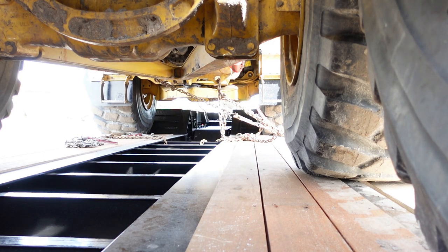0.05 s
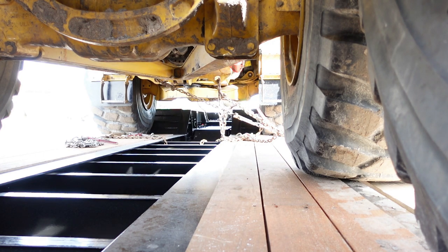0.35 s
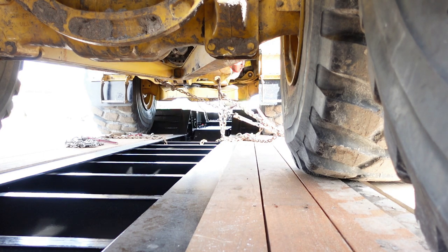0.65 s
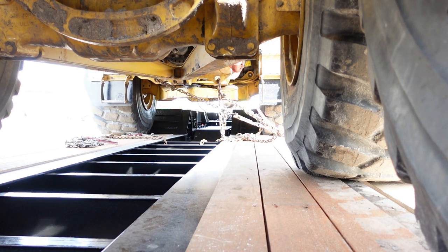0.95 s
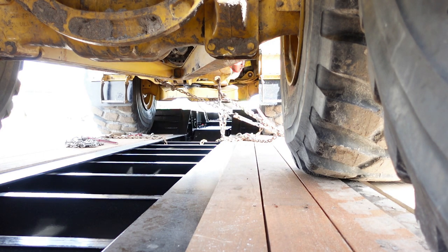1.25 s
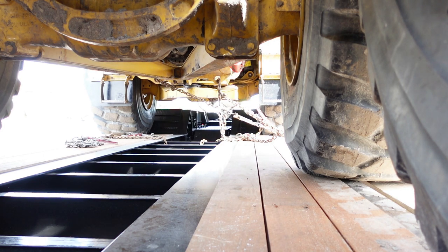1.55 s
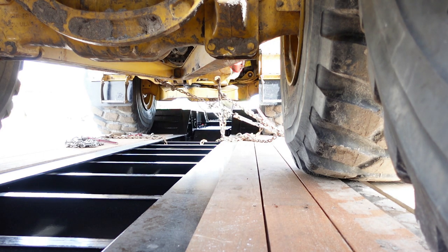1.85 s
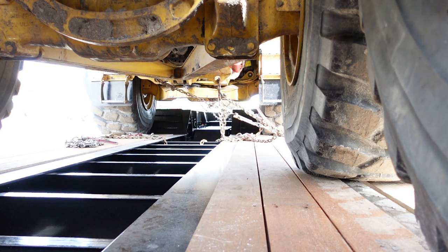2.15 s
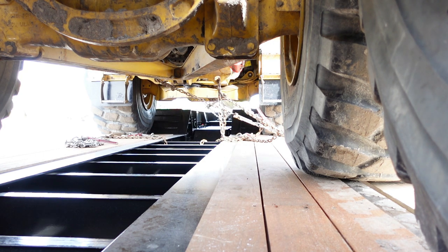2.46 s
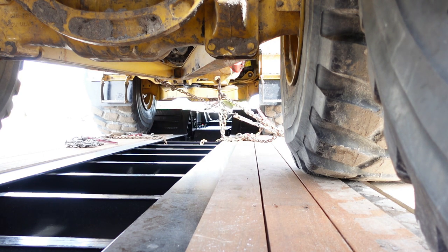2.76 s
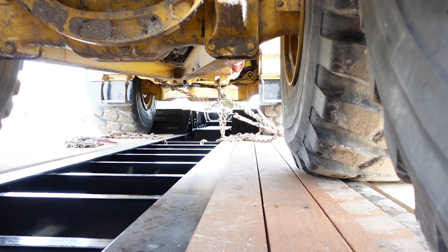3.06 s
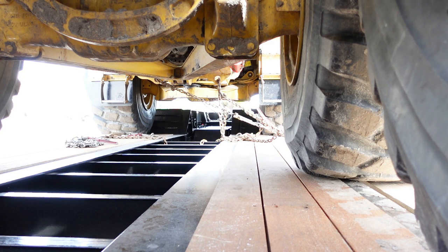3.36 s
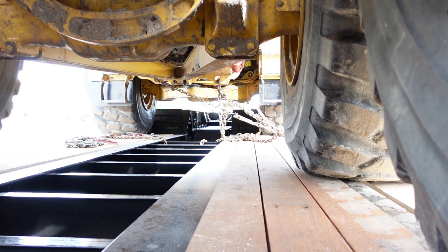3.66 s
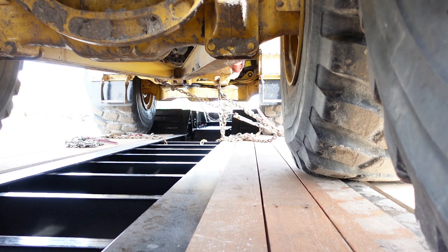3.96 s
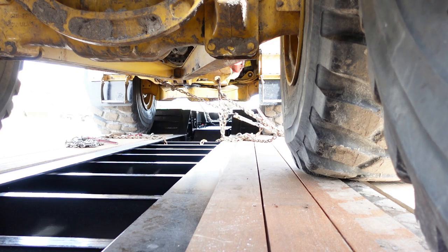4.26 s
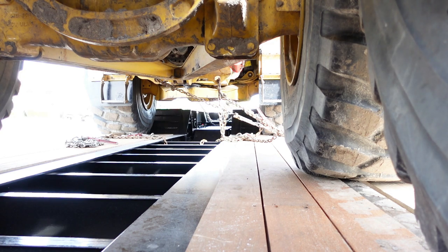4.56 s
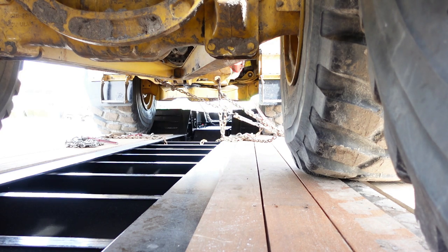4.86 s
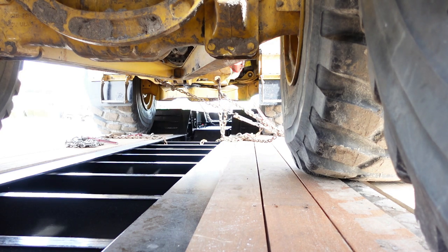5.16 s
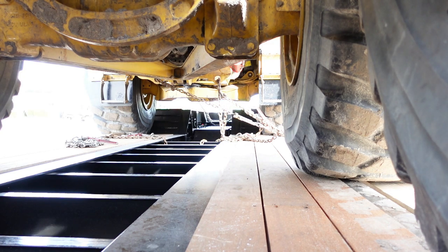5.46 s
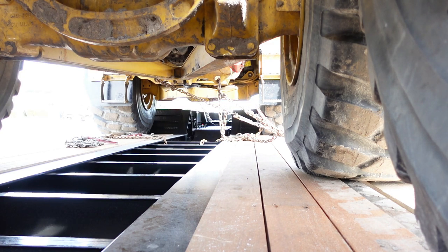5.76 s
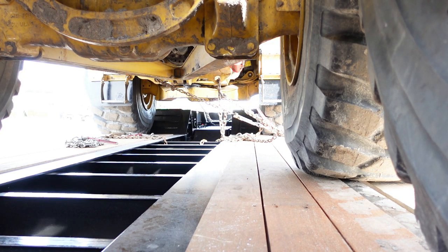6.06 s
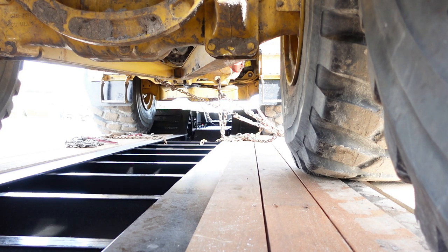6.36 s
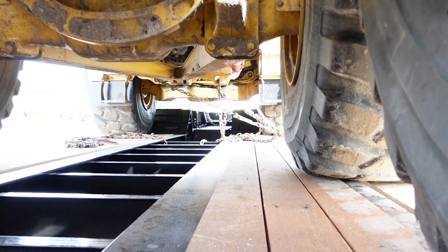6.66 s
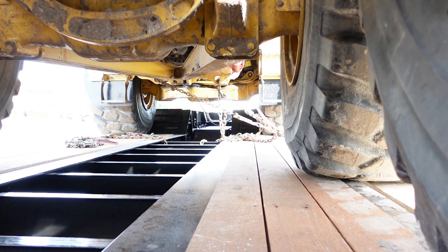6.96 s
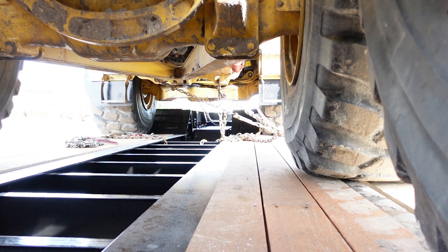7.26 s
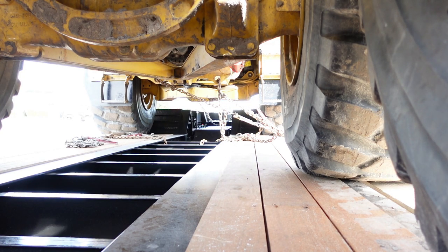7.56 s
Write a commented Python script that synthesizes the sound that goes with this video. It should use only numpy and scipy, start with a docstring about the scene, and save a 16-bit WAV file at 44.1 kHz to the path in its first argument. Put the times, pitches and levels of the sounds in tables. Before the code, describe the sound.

Steel chains are hauled in tugs over a trailer's metal frame, clattering and jingling, with light wind and a distant engine.

```python
"""Chains on a flatbed trailer

Steel tie-down chains are hauled in tugs over the frame, heard from under the machine it carries.
Links clatter on the steel, which rings densely; the deck thuds and the links jingle very high.
Wind puffs at the microphone, an engine drones far off, and a limiter holds the loud rattles down."""
import sys
import numpy as np
from scipy import signal
from scipy.fft import rfft, irfft, next_fast_len
from scipy.io import wavfile
from scipy.ndimage import uniform_filter1d

SR = 44100
rng = np.random.default_rng(int(sys.argv[2]) if len(sys.argv) > 2 else 0)


def materialize(psi):
    """Save the field psi as 16-bit PCM at rate SR to the path in sys.argv[1].

    A 1-D psi becomes a single channel; in a 2-D psi each row is a channel.
    """
    bounded = np.clip(np.atleast_2d(psi).T, -1, 1)
    quanta = np.round(bounded * 32767).astype(np.int16)
    wavfile.write(sys.argv[1], SR, quanta)


N = 336042
TIME = np.arange(N) / SR
RING_TIME = np.arange(SR // 2) / SR
BUILD_UP = 1 - np.exp(-RING_TIME / .004)  # echoes between deck and machine take a moment to pile up

# Levels in the tables are relative: the functions set the final mix.
# Faders of the background. Each row: time in seconds, yard level in dB, engine swell in dB.
YARD_FADERS = [(0, -43, -37), (1.9, -42, 3.5), (3.2, -44.5, -5.5), (4.6, -44, -9), (5.1, -42.5, -4),
               (5.3, -44, 4.5), (5.9, -44, 7), (6.6, -41.5, 4), (7.0, -40, -16.5), (7.7, -41.5, 6.5)]
# Open-air rumble. Each row: frequency in Hz, spectral level in dB.
YARD_COLOUR = [(90, -24.5), (140, -3), (200, 2), (280, -0.5), (400, -3), (550, -1.5), (800, -1.5),
               (1000, -4), (1300, -12), (2000, -23.5), (3200, -32), (5000, -39), (9000, -44.5),
               (15500, -47.5)]
# Wavering patches in the rumble. Each row: centre in Hz, width in Hz, level in dB.
YARD_PATCHES = [(542, 100, -57), (659, 19, -61.5), (799, 17, -57.5), (963, 39, -59.5)]
# Drone of the far engine. Each row: pitch in Hz, width in Hz, level in dB.
ENGINE_TONES = [(169.4, 25, -47.5), (518, 49, -60.5), (719, 26, -58.5)]
# Level of the low wind rumble, which dips sharply under the loud crash at 1.5 s.
# Each row: time in seconds, level in dB.
WIND_RUMBLE_FADER = [(0, -48.5), (.55, -37.5), (.8, -40), (1.1, -39), (1.25, -45.5), (1.42, -48),
                     (1.5, -76), (1.57, -74), (1.62, -41), (1.95, -55), (2.15, -39.5), (3.1, -42.5),
                     (3.3, -46), (3.5, -45), (4.2, -35), (4.55, -54), (4.9, -48.5), (5.04, -62),
                     (5.15, -53.5), (6.1, -55.5), (6.78, -42.5), (6.9, -69), (7.08, -63), (7.3, -49),
                     (7.62, -64)]
# Low body of the wind. Each row: frequency in Hz, spectral level in dB.
WIND_COLOUR = [(25, -33.5), (45, -20), (70, -5), (110, 2), (160, 0), (230, -7.5), (400, -18.5), (800, -40),
               (3000, -91)]
# Strong puffs of wind. Each row: start in seconds, level in dB.
WIND_PUFFS = [(0.009, -22.5), (0.475, -19), (0.818, -26), (0.919, -29), (0.998, -23.5), (1.062, -28),
              (2.304, -21.5), (2.781, -19), (2.851, -27.5), (2.949, -35), (3.06, -26.5), (3.398, -21.5),
              (3.47, -14.5), (3.527, -16), (3.696, -14), (3.838, -19), (4.199, -28), (4.31, -29)]
# A faint rising squeak. Each row: time in seconds, level in dB, pitch in Hz.
SQUEAK_GLIDE = [(6.341, -70, 2550), (6.378, -49.5, 2850), (6.411, -59, 3200), (6.45, -66, 3660),
                (6.48, -77, 3850)]

# A tug runs chain over the frame. Each row: start and length in seconds, then the levels in dB of
# clatter, boom, deck thud, hard-edge crash and jingle.
TUGS = [(0.322, 0.046, -28.5, -42.5, -48.5, -34, -43.5), (0.405, 0.09, -19.5, -32, -42.5, -27.5, -41.5),
        (0.555, 0.037, -19.5, -46, -46.5, -21, -23.5), (0.605, 0.034, -19, -22.5, -25, -26.5, -21.5),
        (0.644, 0.099, -25, -39.5, -33, -24, -22), (1.142, 0.066, -33.5, -31, -38.5, -45.5, -48),
        (1.457, 0.053, -23, -35, -63, -20, -38), (1.516, 0.072, -17, -21, -53, -23, -34),
        (1.56, 0.019, -26, -20.5, -48.5, -35, -41), (1.581, 0.048, -28, -29, -36, -30, -30.5),
        (2.05, 0.076, -19, -35.5, -33.5, -31, -47), (2.086, 0.073, -18.5, -19, -20.5, -34.5, -30.5),
        (2.174, 0.11, -22, -28, -43, -29.5, -27.5), (2.406, 0.14, -15, -28, -40.5, -20.5, -28),
        (2.564, 0.15, -22.5, -26, -36, -27.5, -38), (2.715, 0.061, -33.5, -43.5, -43, -51, -70),
        (3.725, 0.099, -17, -28.5, -49, -24.5, -20.5), (3.783, 0.096, -18.5, -22.5, -29.5, -22, -35.5),
        (3.978, 0.096, -16, -39, -41, -23.5, -32), (3.888, 0.043, -32.5, -42.5, -50, -40.5, -47.5),
        (4.078, 0.026, -44.5, -38.5, -43, -50, -42), (6.717, 0.027, -18.5, -21, -28.5, -30, -33.5),
        (7.08, 0.067, -29.5, -26.5, -57, -67, -53), (7.33, 0.066, -34.5, -57, -59, -58, -62)]
# A few links drop together. Each row: time in seconds, then clatter, crash and jingle levels in dB.
DROPS = [(0.018, -35.5, -44, -32), (0.112, -39, -46.5, -28.5), (0.1596, -40.5, -58, -57),
         (0.2077, -37, -47.5, -29), (0.257, -27.5, -67, -53), (0.512, -19.5, -30.5, -23),
         (0.9865, -52, -64, -40), (1.0106, -37, -76, -71), (1.085, -42, -52, -35), (1.139, -20, -35.5, -44),
         (1.2014, -26, -50, -39.5), (1.237, -26.5, -46, -50), (1.33, -29.5, -28.5, -15.5),
         (1.367, -16.5, -35, -15.5), (1.4044, -34, -37, -21.5), (1.6976, -20, -34, -35),
         (1.7413, -13, -28, -31), (1.8082, -25, -55, -70), (2.016, -17, -52, -33), (2.2696, -8, -23.5, -36),
         (2.335, -14, -29, -35), (2.384, -18, -25, -22), (2.6395, -14, -20.5, -40),
         (2.7534, -16, -28.5, -42), (2.778, -15, -30.5, -42), (2.8654, -25, -31.5, -35),
         (3.123, -35, -54, -70), (3.4763, -26.5, -45.5, -44), (3.54, -25.5, -27.5, -25.5),
         (3.629, -32.5, -49, -57), (3.6773, -51, -60, -39.5), (4.146, -10.5, -35.5, -49),
         (4.22, -25, -52, -78), (4.9093, -46, -52, -66), (5.435, -51, -63, -77), (6.616, -25, -50, -52),
         (6.6734, -26, -50, -47), (6.869, -25.5, -71, -74), (6.8924, -30.5, -72, -71),
         (6.935, -24, -72, -57), (7.0167, -17.5, -44, -40), (7.0964, -14, -63, -57), (7.206, -19, -50, -52),
         (7.316, -19.5, -40.5, -54), (7.3784, -36, -36.5, -56), (7.4314, -30, -54, -49),
         (7.4851, -14.5, -37, -60), (7.6104, -31.5, -44, -59)]
# One link hits an edge hard. Each row: start in seconds, ring level in dB, splash level in dB.
STRIKES = [(.3996, -21, -63), (.4545, -18.5, -63), (.5503, -12, -57), (.6426, -9, -44.5),
           (.7363, -25, -60.5), (1.3344, -26.5, -47.5), (1.4641, -26, -33), (2.1979, -22, -59.5),
           (2.2248, -20, -58), (2.2712, -37, -42), (2.3865, -8.5, -39), (2.4413, -19, -62),
           (2.4945, -18, -36.5), (2.6369, -21, -48), (2.6878, -19.5, -56), (3.7113, -28, -50),
           (3.7582, -6.5, -56), (3.858, -16, -61), (3.9642, -37, -58), (4.0051, -9.5, -55.5),
           (4.069, -22, -57), (4.1418, -23.5, -75)]
# Parts of the frame ringing alone. Each row: start in seconds, pitch in Hz, peak in dB, T60 in seconds.
CLEAR_RINGS = [(1.224, 1700, -38, .2), (2.778, 1586, -22, .13), (2.772, 2970, -26, .07),
               (3.828, 3664, -24, .13), (3.844, 1200, -26, .13), (6.73, 1023, -23, .18),
               (7.491, 1137, -32, .2), (7.608, 4950, -35, .1)]
# Which chain is being handled. Each row: time in seconds, heavy chain over light chain in dB.
CHAIN_BALANCE = [(.22, 34), (.31, -22), (.78, -24.5), (.98, 29), (1.09, 20), (1.16, 6.5), (1.25, 0.5),
                 (1.33, 14.5), (1.6, 22.5), (1.8, 17), (2.0, -22), (2.55, -16.5), (2.68, 18), (2.87, 18),
                 (3.5, -30), (3.95, -12), (4.1, 14), (6.6, -27.5)]
# Notes of the two chains' links. Each row: pitch in Hz, level in dB.
HEAVY_LINKS = [(10110, 0), (10510, -2), (11200, 0)]
LIGHT_LINKS = [(10850, -3), (11005, -2), (11270, 1), (11460, 0), (11820, -1), (11960, 2), (12260, -1),
               (12595, -.5), (12750, -3)]

# How long the frame rings. Each row: frequency in Hz, T60 in seconds.
FRAME_T60 = [(150, 0.23), (500, 0.19), (1300, 0.18), (3500, 0.12), (9000, 0.1)]
# The frame's strongest modes. Each row: pitch in Hz, level in dB, T60 in seconds.
FRAME_MODES = [(518, -22, .2), (717, -18.5, .14), (961, -15, .18), (1236, -15.5, .16), (1530, -16.5, .1),
               (1765, -12.5, .14), (1995, -15, .14), (2250, -13, .14), (2362, -15, .14), (2600, -17, .12),
               (2830, -18, .12), (3651, -24, .11), (4320, -26, .1), (5350, -23, .1)]
# Voices of the trailer: clatter and boom of the frame, crash and splash of its edges, thud of the deck.
# Each row: frequency in Hz, spectral level in dB.
CLATTER_COLOUR = [(150, -45), (350, -15), (700, -14.5), (1000, -0.5), (1400, 0), (2200, 3), (2700, -2.5),
                  (3300, -11), (4300, -10), (6000, -41.5), (10000, -59.5)]
BOOM_COLOUR = [(200, -16.5), (320, -2.5), (480, 1.5), (680, -0.5), (1000, 4.5), (1300, -4), (1800, -29),
               (4000, -59)]
CRASH_COLOUR = [(1000, -25.5), (2800, 10), (3700, 6), (5300, 6), (6500, -2), (8000, -5.5), (9600, -17.5),
                (12500, -25), (14000, -46.5), (15500, -61)]
SPLASH_COLOUR = [(3000, -34.5), (6500, -5.5), (8500, 0.5), (12000, -3), (14500, -6.5)]
THUD_COLOUR = [(70, -28), (120, -11.5), (190, 10.5), (260, 3), (330, -12), (420, 1), (800, -42),
               (3000, -94)]
# Bars and brackets that a link hits squarely. Each row: pitch in Hz, level in dB.
PING_LEVELS = [(500, -1.5), (900, -1), (1500, 3), (2300, 7), (3000, 0.5), (4000, -5), (5500, -12)]


def from_db(db):
    """Decibels to gain."""
    return 10 ** (np.asarray(db) / 20)


def rms_one(x):
    """Scale to unit power."""
    return x / np.sqrt(np.mean(x ** 2) + 1e-20)


def unit_energy(response, axis=-1):
    """Scale so that the squares along an axis sum to one, which keeps the power of a drive."""
    return response / np.sqrt(np.sum(response ** 2, axis=axis, keepdims=True))


def at_hz(points, hz):
    """Read a table on a log-frequency axis."""
    f, value = np.transpose(points)
    return np.interp(np.log(np.maximum(hz, 1)), np.log(f), value)


def fader(rows, column=1, beyond=-np.inf):
    rows = np.array(rows)
    return from_db(np.interp(TIME, rows[:, 0], rows[:, column], left=beyond, right=beyond))


def drift(rate_hz):
    """A smooth random wander with a spread of about one."""
    hz = np.fft.rfftfreq(N // 40, 40 / SR)
    slow = irfft(rfft(rng.standard_normal(N // 40)) / (1 + (hz / rate_hz) ** 2))
    return np.interp(np.linspace(0, len(slow) - 1, N), np.arange(len(slow)), rms_one(slow))


def noise(colour):
    """Coloured noise, unrelated in the two channels."""
    size = next_fast_len(N)
    hz = np.fft.rfftfreq(size, 1 / SR)
    gain = from_db(at_hz(colour, hz)) * np.minimum(hz / colour[0][0], 1) ** 2
    return rms_one(irfft(rfft(rng.standard_normal((2, size))) * gain, size)[:, :N])


def wavering_tone(hz, width_hz):
    """A narrow band of noise, unrelated in the two ears."""
    phase = 2 * np.pi * hz * TIME
    return np.array([drift(width_hz) * np.sin(phase) + drift(width_hz) * np.cos(phase) for ear in (0, 1)])


def swells(starts, lengths, levels_db, rise_s, fall_s, sag_db_per_s=0):
    """Envelope of events that each swell, hold or sag, and die away; their powers add."""
    power = np.zeros(N)
    for start, length, db in np.broadcast(starts, lengths, levels_db):
        near = slice(*np.searchsorted(TIME, [start - .15, start + length + .3]))
        age = TIME[near] - start
        outside = np.maximum(-age / rise_s, (age - length) / fall_s).clip(0)
        power[near] += (from_db(db - sag_db_per_s * age.clip(0)) * np.exp(-outside)) ** 2
    return np.sqrt(power)


def excite(drive, response):
    """Play a drive through a stereo response."""
    return signal.oaconvolve(drive[None], response, axes=1)[:, :N]


def yard(waver_db=2.9, patchy_db=6.0):
    """A bed of open-air rumble that wavers in patches."""
    air = fader(YARD_FADERS) * noise(YARD_COLOUR) * from_db(waver_db * drift(7.6))
    patches = sum(from_db(db + patchy_db * drift(6)) * wavering_tone(hz, width)
                  for hz, width, db in YARD_PATCHES)
    return air + patches


def far_engine():
    """A distant drone: three unsteady tones that swell and fade together."""
    drone = sum(from_db(db) * wavering_tone(hz, width) for hz, width, db in ENGINE_TONES)
    return fader(YARD_FADERS, column=2) * drone


def wind(rumble_db=3.5, puff_db=-6.5, puff_s=0.019, lumps_db=4.0, pan_db=1.6):
    """A lumpy low wind rumble with sudden puffs on the microphone, stronger on the left."""
    starts, db = np.transpose(WIND_PUFFS)
    puffs = swells(starts, puff_s, db + puff_db, rise_s=0.014, fall_s=0.012)
    rumble = from_db(rumble_db) * fader(WIND_RUMBLE_FADER, beyond=None)
    lumps = rms_one(noise(WIND_COLOUR) * from_db(lumps_db * drift(30)))
    return np.hypot(rumble, puffs) * lumps * from_db([[pan_db], [-pan_db]])


def squeak(roughness=0.11, lower_ratio=.68, lower_db=2.0):
    """A rough, rising rub with a second, lower note."""
    times, _, hz = np.transpose(SQUEAK_GLIDE)
    out = 0
    for ratio, gain in ((1, 1), (lower_ratio, from_db(lower_db))):
        jitter = 1 + roughness * np.array([drift(227.5), drift(186)])
        pitch = ratio * np.interp(TIME, times, hz) * jitter
        out = out + gain * np.sin(2 * np.pi * np.cumsum(pitch, axis=1) / SR)
    return fader(SQUEAK_GLIDE) * out


def mode(hz, t60):
    """A dying sine that reaches each ear by its own paths."""
    phase = rng.uniform(0, 2 * np.pi)
    ear_shift = rng.uniform(.25, .75) * np.pi * rng.choice([-1, 1])
    tone = np.sin(2 * np.pi * hz * RING_TIME + phase + np.array([[0], [ear_shift]]))
    return unit_energy(tone * from_db(-60 * RING_TIME / t60) * BUILD_UP)


def clear_rings():
    """Now and then one part of the frame is left ringing on its own."""
    out = np.zeros((2, N + len(RING_TIME)))
    for start_s, hz, db, t60 in CLEAR_RINGS:
        ring, start = mode(hz, t60), int(start_s * SR)
        out[:, start:start + len(RING_TIME)] += from_db(db) * ring / np.abs(ring).max()
    return out[:, :N]


def frame_response(colour, tail_db=-30.0, tail_t60=0.57):
    """Dense plate modes and reflections under the machine die band by band, over a faint yard echo."""
    edges = np.geomspace(80, 16000, 28)
    white = rng.standard_normal((2, 2, len(RING_TIME)))
    tail = from_db(tail_db - 60 * RING_TIME / tail_t60)
    out = 0
    for k, (low, high) in enumerate(zip(edges, edges[1:])):
        hz = np.sqrt(low * high)
        fade = np.hypot(from_db(-60 * RING_TIME / at_hz(FRAME_T60, hz)), tail) * BUILD_UP
        bandpass = signal.butter(2, [low, high], "band", fs=SR, output="sos")
        band = signal.sosfilt(bandpass, white[k % 2] * fade)
        out = out + unit_energy(band) * from_db(at_hz(colour, hz)) * np.sqrt(high - low)
    return unit_energy(out)


def deck_response():
    """The planks thud dully and have one clear hollow note."""
    return unit_energy(frame_response(THUD_COLOUR) + mode(hz=312, t60=0.14))


def contacts(per_s, uneven_db):
    """Link touches at random moments and of uneven strength, with a steady mean power."""
    strength = from_db(uneven_db * rng.standard_normal(N)) * rng.choice([-1, 1], N)
    touches = strength * (rng.random(N) < per_s / SR)
    return touches / np.sqrt(np.abs(uniform_filter1d(touches ** 2, size=700)) + 1e-5)


def pulling(levels_db, rise_s, fall_s, lead_s=0.0099):
    """Force of the tugs: the chain picks up speed, slowly loses it and comes to rest."""
    starts, lengths = np.transpose(TUGS)[:2]
    return swells(starts - lead_s, lengths, levels_db, rise_s, fall_s, sag_db_per_s=22.5)


def dropping(levels_db, length_s, rise_s, fall_s, lead_s=0.0054):
    """Force of the drops: links land in a quick swell, just ahead of the ringing they build up."""
    return swells(np.transpose(DROPS)[0] - lead_s, length_s, levels_db, rise_s, fall_s)


def force(pull, drop, pull_db, drop_db):
    """The stronger of pull and drop moves the links."""
    return np.maximum(from_db(pull_db) * pull, from_db(drop_db) * drop)


def hard_strikes(low_hz=2150, high_hz=8340, t60=.085, uneven_db=3, tilt_db_per_octave=-4.0, count=36):
    """A link hits an edge hard, rings with partials of its own and throws a bright splash."""
    age = RING_TIME[:SR // 5]
    fade = from_db(-60 * age / t60) * BUILD_UP[:len(age)]
    out = np.zeros((2, N + len(age)))
    for start_s, db, _ in STRIKES:
        hz = low_hz * (high_hz / low_hz) ** rng.random((count, 1))
        tilt_db = tilt_db_per_octave * np.log2(hz / low_hz)
        gains = from_db(uneven_db * rng.standard_normal((count, 1)) + tilt_db)
        partials = np.sum(gains * np.sin(2 * np.pi * (hz * age + rng.random((2, count, 1)))), axis=1)
        start = int(start_s * SR)
        out[:, start:start + len(age)] += from_db(db) * rms_one(partials) * fade
    starts, _, splash_db = np.transpose(STRIKES)
    splashes = swells(starts, .012, splash_db, rise_s=.004, fall_s=.012)
    touches = splashes * contacts(per_s=900, uneven_db=3.5)
    return out[:, :N] + excite(touches, frame_response(SPLASH_COLOUR))


def link_ring(hz, t60=.07, width_hz=90, tick_db=-17.0, tick_band_hz=(9300, 13100)):
    """A link's high note and the short tick that starts it, scattered on their way to each ear."""
    scatter = rng.standard_normal((2, len(RING_TIME))) * BUILD_UP
    fade = from_db(-60 * RING_TIME / t60)
    resonance = signal.iirpeak(hz, hz / width_hz, fs=SR)
    note = signal.lfilter(*resonance, signal.lfilter(*resonance, scatter * fade))
    bandpass = signal.butter(5, tick_band_hz, "band", fs=SR, output="sos")
    tick = signal.sosfilt(bandpass, scatter * fade ** 2)
    return unit_energy(unit_energy(note) + from_db(tick_db) * unit_energy(tick))


def jingle(links, shake, flicker_db):
    """Each pitch belongs to a group of nearly equal links; the shaking passes from group to group."""
    shares = unit_energy(from_db([db + flicker_db * drift(18) for _, db in links]), axis=0)
    touches = shake * contacts(per_s=790, uneven_db=11.5)
    return sum(excite(share * touches, link_ring(hz)) for (hz, _), share in zip(links, shares))


def chains():
    """The high sparkle of the two chains, shared out by which one is being handled."""
    tugs = pulling(np.transpose(TUGS)[-1], rise_s=0.006, fall_s=0.013)
    drops = dropping(np.transpose(DROPS)[-1], length_s=0.0051, rise_s=0.0054, fall_s=.0035)
    balance = fader(CHAIN_BALANCE, beyond=None)
    light = force(tugs, drops, pull_db=-0.5, drop_db=1.0) / np.hypot(1, balance)
    heavy = light * balance
    return jingle(HEAVY_LINKS, heavy, flicker_db=8.0) + jingle(LIGHT_LINKS, light, flicker_db=2.5)


def pings(blows, ping_db=3.5, typical_t60=0.083, uneven_db=10.0, count=2400):
    """Square hits ring single bars for a moment, each at a pitch of its own."""
    age = RING_TIME[:SR // 6]
    out = np.zeros((2, N + len(age)))
    low, high = np.log([PING_LEVELS[0][0], PING_LEVELS[-1][0]])
    for when, pitch, softness, length, left, right in rng.random((count, 6)):
        start, hz = int(when * N), np.exp(low + (high - low) * pitch)
        gain = blows[start] * from_db(ping_db + at_hz(PING_LEVELS, hz) - uneven_db * softness)
        fade = from_db(-60 * age / (typical_t60 * (.5 + length))) * BUILD_UP[:len(age)]
        tone = np.sin(2 * np.pi * (hz * age + np.array([[left], [right]])))
        out[:, start:start + len(age)] += gain * fade * tone
    return out[:, :N]


def along_frame(blows, colour, ring_db, wander_db, places):
    """The chain strikes one place after another, and each place favours other modes."""
    shares = unit_energy(from_db([wander_db * drift(10) for _ in range(places)]), axis=0)
    out = 0
    for share in shares:
        modes = sum(from_db(db + rng.normal(0, 4.4)) * mode(hz, t60) for hz, db, t60 in FRAME_MODES)
        place = unit_energy(frame_response(colour) + from_db(ring_db) * modes)
        out = out + excite(blows * share * contacts(per_s=450, uneven_db=3.5), place)
    return out


def trailer_frame():
    """Links clatter on the frame and crash on its edges; their weight booms in it and thuds the deck."""
    _, _, tug_clatter, tug_boom, tug_thud, tug_crash, _ = np.transpose(TUGS)
    _, drop_clatter, drop_crash, _ = np.transpose(DROPS)
    drops = dropping(drop_clatter, length_s=0.0079, rise_s=0.0071, fall_s=0.0029)
    running = pulling(tug_clatter, rise_s=0.013, fall_s=0.035)
    blows = force(running, drops, pull_db=-4.0, drop_db=-7.0)
    clatter = along_frame(blows, CLATTER_COLOUR, ring_db=-1.0, wander_db=12.5, places=3)
    bars = pings(force(running, drops, pull_db=-1.5, drop_db=-8.0))

    edge_drops = dropping(drop_crash, length_s=0.0053, rise_s=0.0076, fall_s=0.0085)
    edge_tugs = pulling(tug_crash, rise_s=0.008, fall_s=0.0045)
    edge_blows = force(edge_tugs, edge_drops, pull_db=-0.5, drop_db=1.0)
    crash = along_frame(edge_blows, CRASH_COLOUR, ring_db=-14.0, wander_db=9.5, places=2)

    weight = force(pulling(tug_boom, rise_s=0.014, fall_s=.019), drops, pull_db=-3.0, drop_db=-19.0)
    heave = pulling(tug_thud, rise_s=0.0071, fall_s=0.0086)
    touches = contacts(per_s=600, uneven_db=-2.0)
    boom = excite(weight * touches, frame_response(BOOM_COLOUR))
    thud = excite(heave * touches, deck_response())
    return clatter + bars + crash + boom + thud


def scene(steel_db=0.5):
    """Chains and trailer up front, over wind, yard and engine."""
    steel = from_db(steel_db) * (trailer_frame() + chains() + hard_strikes())
    return steel + clear_rings() + squeak() + wind() + yard() + far_engine()


def record(dry, threshold_db=-16, release_db_per_s=158.5, cutoff_hz=15700):
    """A quick limiter flattens the loud rattles; the top is cut steeply."""
    power = np.abs(uniform_filter1d(np.mean(dry ** 2, axis=0), size=220))
    over_db = np.maximum(10 * np.log10(power + 1e-12) - threshold_db, 0)
    release_db = release_db_per_s * TIME
    reduction_db = np.maximum.accumulate(over_db + release_db) - release_db
    limited = dry * from_db(-uniform_filter1d(reduction_db, size=90))
    return signal.sosfilt(signal.ellip(12, .1, 80, cutoff_hz, fs=SR, output="sos"), limited)


dry = scene()
out = record(dry)
materialize(out)
```